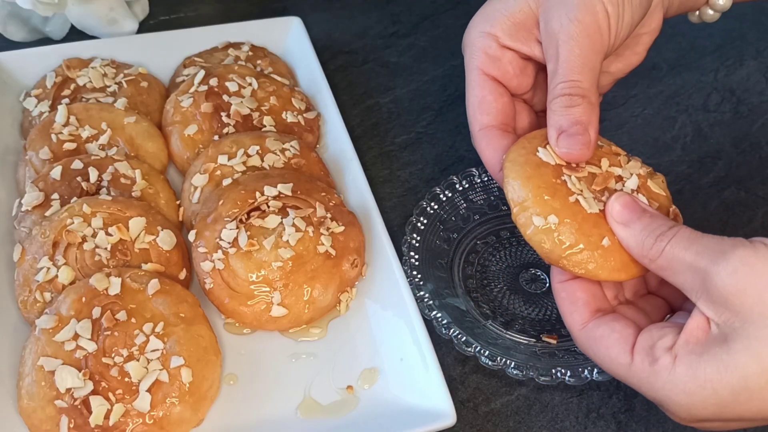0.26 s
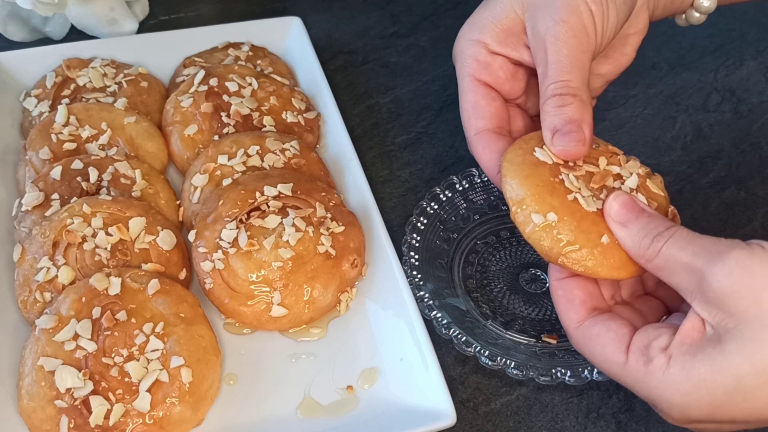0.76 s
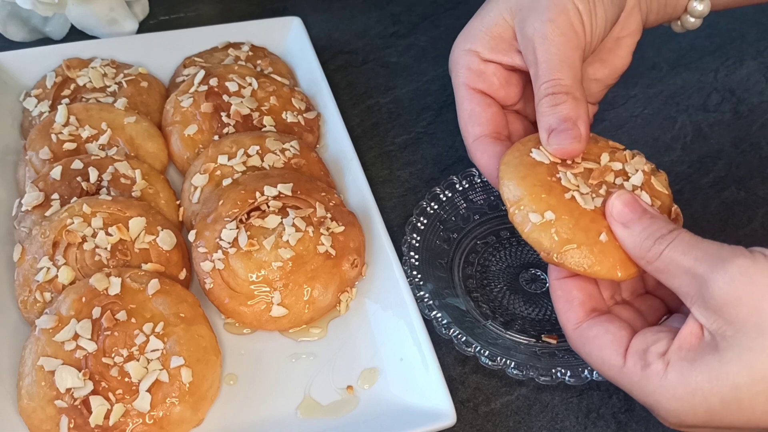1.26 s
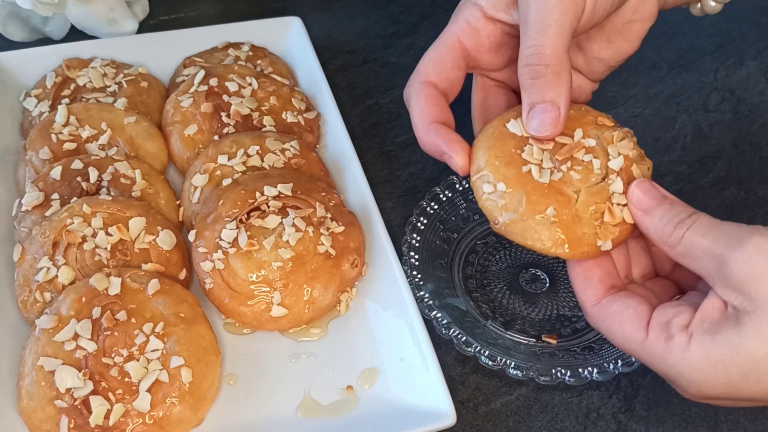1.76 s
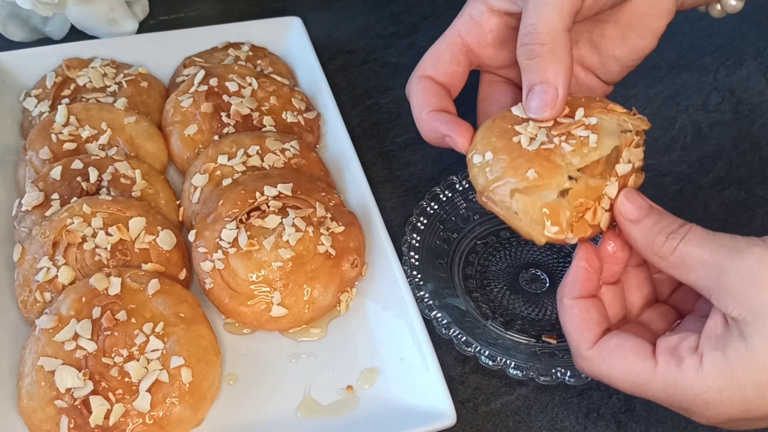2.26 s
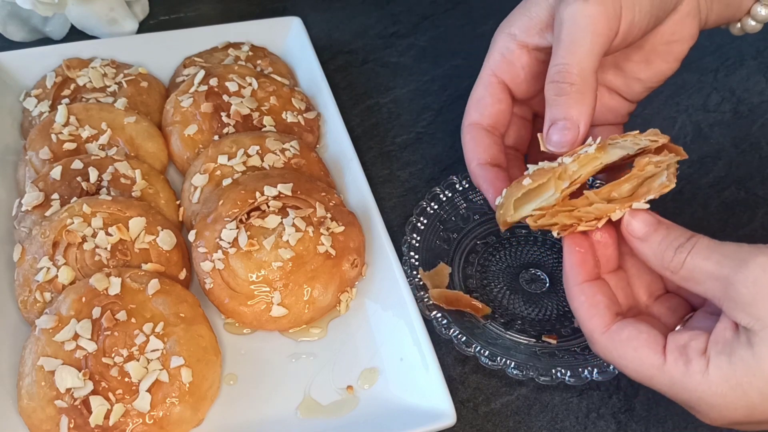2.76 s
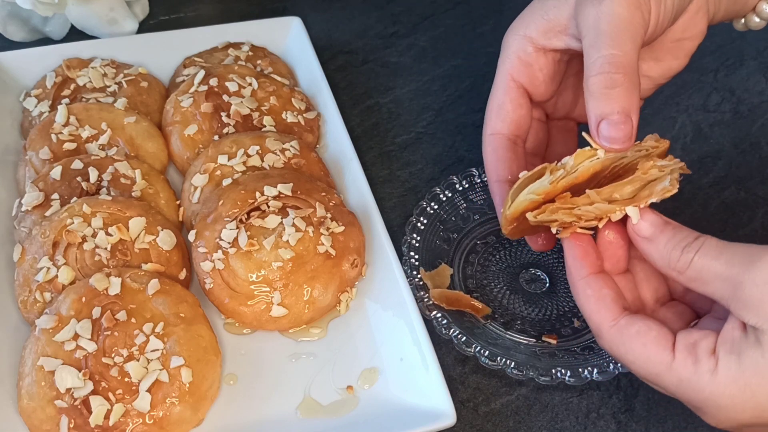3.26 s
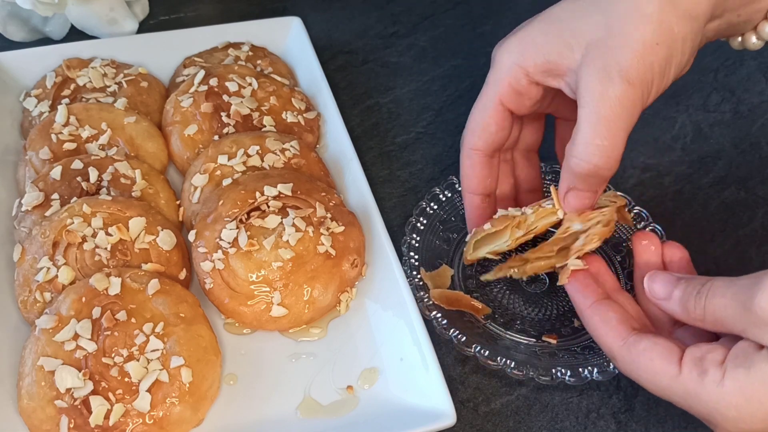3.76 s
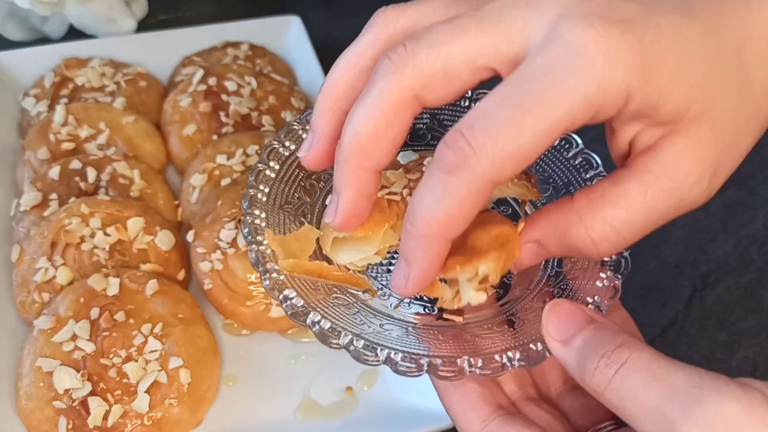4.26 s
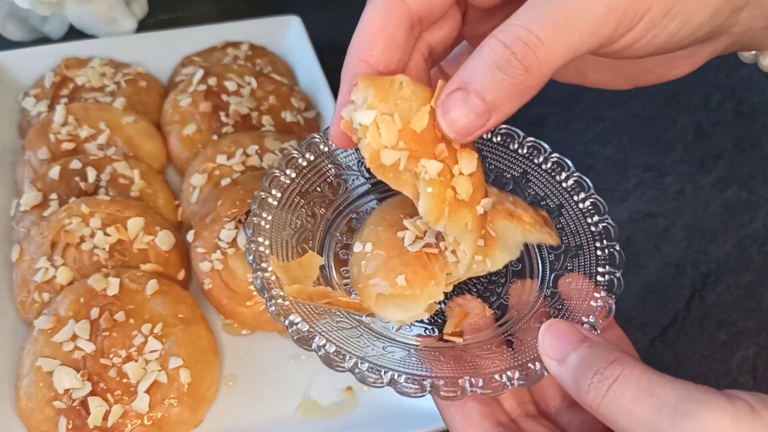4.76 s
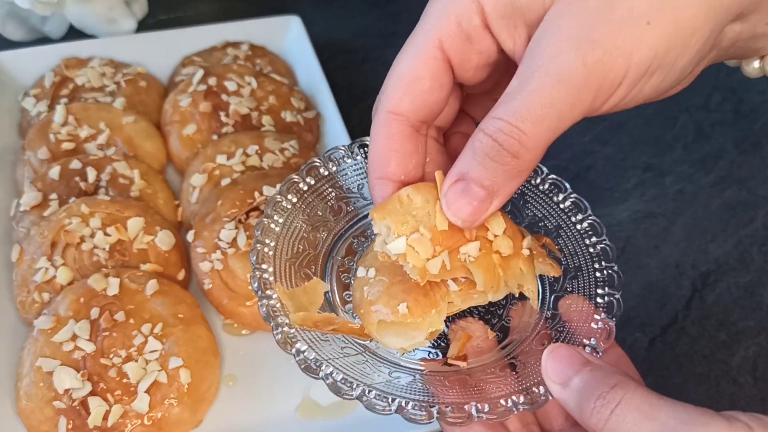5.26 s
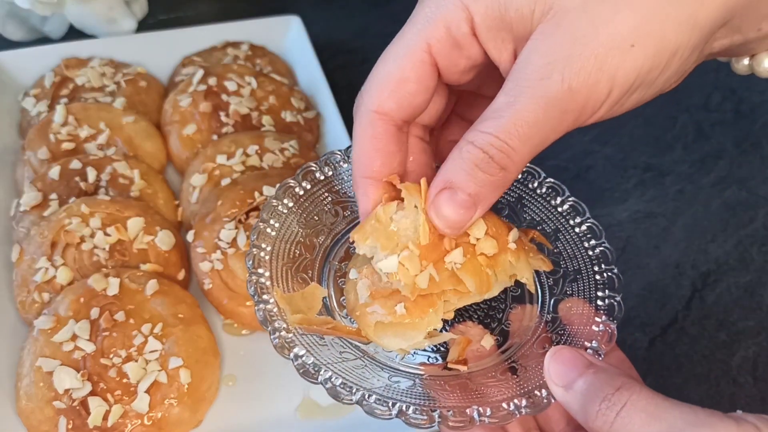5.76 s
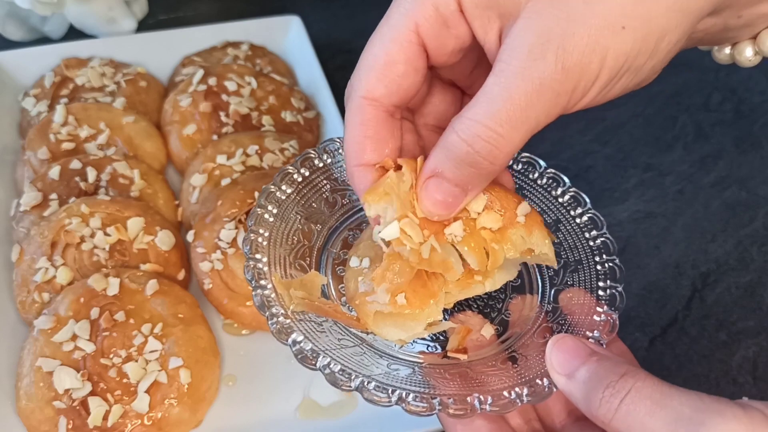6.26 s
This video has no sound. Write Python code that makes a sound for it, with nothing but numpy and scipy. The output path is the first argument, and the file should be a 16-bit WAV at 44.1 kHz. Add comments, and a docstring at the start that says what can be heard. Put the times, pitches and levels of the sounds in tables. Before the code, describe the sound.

Close, dry crust snaps and brittle crackles come in uneven bursts, then soft thuds on a glass plate and a sharp final crunch.

```python
"""In a quiet room, two hands break a crisp, flaky pastry over a small glass plate, close to a phone.
The crust snaps flake by flake (sharp pulses with splinters) and tears in short runs of tiny fractures.
Crumbs crackle under the fingers, bits ring the plate's decaying modes, and the halves are laid down with dull thuds.
Then one half is lifted and squeezed with a loud crunch. A low hum and shaped room noise lie underneath."""
import sys
import numpy as np
from scipy import signal
from scipy.fft import rfft, irfft
from scipy.io import wavfile
from scipy.ndimage import uniform_filter1d, map_coordinates

SR = 44100
rng = np.random.default_rng(int(sys.argv[2]) if len(sys.argv) > 2 else 0)


def put_to_file(sound):
    """Save the sound as 16-bit audio at rate SR, in the file named by the first command-line argument."""
    columns = np.atleast_2d(sound).T  # one column per channel
    safe = np.clip(columns, -1, 1)
    whole_steps = np.round(safe * 32767)
    wavfile.write(sys.argv[1], SR, whole_steps.astype(np.int16))


N = 286650
TIME = np.arange(N) / SR
# ranges of pitch in which thick crumbs and thin splinters ring [Hz]
THICK_HZ, THIN_HZ = (500, 900, 1550, 2600), (4300, 7200, 13000)


def undb(db):
    """Decibels to gain."""
    return 10 ** (np.asarray(db) / 20)


def unit(x):
    """Scale to rms 1."""
    return x / np.sqrt(np.mean(x ** 2) + 1e-18)


def add(out, x, start_s):
    """Mix x into out from start_s."""
    i = max(int(start_s * SR), 0)
    n = min(x.shape[-1], N - i)
    out[..., i:i + n] += x[..., :n]


def colour_db(points, hz):
    """Read (frequency [Hz], level [dB]) points on a log-frequency axis."""
    point_hz, db = np.transpose(points)
    return np.interp(np.log(hz + 1), np.log(point_hz), db)


def background(air_db=-57.5, side_db=-3, hum_hz=100.5, hum_db=-62, wander_rad=.35):
    """Steady shaped room noise, part of it opposite in the two sides, and an appliance hum wandering in pitch."""
    # colour of the room noise: (frequency [Hz], level [dB])
    air_colour = [(25, -16), (55, -14), (90, 4.5), (140, 0.5), (300, -1), (600, -8.5), (1500, -16.5),
                  (4500, -21.5), (5300, -25), (6700, -26), (7600, -28), (8800, -37), (11200, -34),
                  (13500, -20)]
    gain = undb(colour_db(air_colour, np.arange(N // 2 + 1) * SR / N))
    mid, side = (unit(irfft(rfft(rng.standard_normal(N)) * gain, N)) for _ in range(2))
    air = unit(mid + undb(side_db) * side * np.array([[1], [-1]]))
    # noise smoothed twice gives a slow phase drift
    drift = uniform_filter1d(rng.standard_normal(N), SR // 12)
    drift = unit(uniform_filter1d(drift, SR // 12))
    hum = unit(np.sin(2 * np.pi * hum_hz * TIME + wander_rad * drift))
    return undb(air_db) * air + undb(hum_db) * hum


def room(x, near_db=-9, near_s=0.0086, tail_db=-10.5, t60_s=0.28, build_s=0.0011):
    """Quick sparse reflections from hands, plate and table, then the short noise-like tail of the room."""
    t, out = TIME[:SR // 2], []
    for channel in x:
        near = fractures(len(t), per_s=6500, spread_db=4.5) * np.exp(-t / near_s)
        near *= t > .0003  # a short gap after the direct sound
        tail = rng.standard_normal(len(t)) * np.exp(-np.log(1000) * t / t60_s)
        tail *= 1 - np.exp(-t / build_s)
        echo = undb(near_db) * near / np.linalg.norm(near) + undb(tail_db) * tail / np.linalg.norm(tail)
        out.append(channel + signal.fftconvolve(channel, echo)[:N])
    return np.array(out)


def ports(x):
    """The two microphone ports hear the pastry a moment apart, depending on where it is held."""
    # where the pastry is held: (time [s], delay of the left port behind the right [samples])
    place = [(0, 2.5), (4.2, 2), (4.6, -2), (6.5, -2.5)]
    lag = np.interp(TIME, *np.transpose(place))
    left = map_coordinates(x[0], [np.arange(N) - lag / 2], order=3)
    right = map_coordinates(x[1], [np.arange(N) + lag / 2], order=3)
    return np.array([left, right])


def bumps(width=1.35, rise_s=0.00012):
    """Soft contacts give short dull thuds: one damped resonance in a rough rattle."""
    # bumps of pastry, fingers and plate: (time [s], level [dB], centre [Hz], decay [s])
    contacts = [(2.458, -49.5, 727, 0.01), (3.636, -56, 608, 0.04), (3.851, -47, 449, 0.014),
                (3.954, -56, 2010, 0.011), (4.057, -45, 380, 0.022), (4.079, -39, 482, 0.018),
                (4.086, -46, 272, 0.048), (4.088, -42, 705, 0.018), (4.081, -46, 114, 0.031),
                (4.331, -57, 86, 0.068), (4.502, -60.5, 83.4, 0.26), (4.781, -47, 636, 0.007),
                (4.82, -44.5, 1490, 0.011), (5.457, -46.5, 287, 0.017), (5.811, -30.5, 1700, 0.0026),
                (5.811, -30.5, 1180, 0.0019), (5.811, -48, 670, 0.0033)]
    out, t = np.zeros(N), TIME[:SR // 2]
    for s, db, hz, decay_s in contacts:
        band = signal.butter(2, [hz / width, hz * width], "band", fs=SR, output="sos")
        rattle = unit(signal.sosfilt(band, rng.standard_normal(len(t))))
        thud = unit(rattle + np.sin(2 * np.pi * hz * t))
        envelope = np.exp(-t / decay_s) * (1 - np.exp(-t / rise_s))
        add(out, thud * envelope * undb(db), s)
    return out


def plate(favour_db=24):
    """Glass modes ring as decaying sines; each contact favours some of them, and the hand damps the ring."""
    # light hits: (time [s], level [dB], favoured pitch [Hz], contact time [ms], share of the full ring time)
    clinks = [(1.4542, -39.5, 3620, 2, 0.72), (2.4572, -35.5, 3380, 0.66, 0.42),
              (2.393, -54.5, 6900, 2.2, 0.64), (3.851, -40.5, 6950, 1.2, 0.092),
              (3.9377, -32.5, 6900, 6.1, 0.22), (3.977, -41.5, 6900, 3.6, 0.15),
              (4.014, -35, 7000, 4, 0.24)]
    # modes of the plate: (pitch [Hz], relative level [dB], full t60 [s])
    modes = [(1895, 6, 0.26), (3970, 0, 0.13), (6370, -4, 0.25), (6803, 21, 0.12)]
    out, t = np.zeros(N), TIME[:SR // 2]
    for s, db, contact_hz, contact_ms, share in clinks:
        ring = 0
        for hz, mode_db, t60 in modes:
            # modes lose favour_db at one octave from the favoured pitch
            gain = undb(mode_db - favour_db * np.log2(hz / contact_hz) ** 2)
            decay = np.exp(-np.log(1000) * t / (t60 * share))
            ring = ring + gain * np.sin(2 * np.pi * (hz * t + rng.random())) * decay
        rise = 1 - np.exp(-t * 10 ** 3 / contact_ms)
        add(out, ring * rise * undb(db), s)
    return out


def thickness(s):
    """Body and edge [dB] of the flakes at time s: thick outer crust first, thin inner leaves in the lifted half."""
    # thickness of the crust: (time [s], body below 3 kHz [dB], edge above 6 kHz [dB])
    layers = [(0, 0.5, 1), (.55, 3.5, -1), (1.8, 4, -4), (2.25, -2, -10), (4.1, 4, -3.5), (4.8, 4.5, -4.5),
              (5.45, -8.5, -5), (5.8, -30, -7.5), (6.2, -20.5, -3), (6.5, -27, 14)]
    times, body_db, edge_db = np.transpose(layers)
    return np.interp(s, times, body_db), np.interp(s, times, edge_db)


def flake(body_db, edge_db, size=512):
    """Causal response of one breaking flake: big ones have body, thin ones edge."""
    # colour of breaking crust at the phone: (frequency [Hz], level [dB])
    crust = [(150, -27.5), (780, -14), (1200, -14), (2250, -3.5), (3200, -7), (4500, 1.5), (5300, -10.5),
             (6550, 9.5), (7500, 6.5), (8400, -2), (9300, -17.5), (11200, -32.5), (11900, -5),
             (15500, -6.5)]
    hz = np.arange(size // 2 + 1) * SR / size
    tilt = [(2400, body_db), (4000, 0), (5000, 0.0042), (6500, edge_db)]
    db = colour_db(crust, hz) + colour_db(tilt, hz)
    # fold the cepstrum for minimum phase, so the energy comes first
    cepstrum = irfft(np.log(undb(db)))
    cepstrum[1:size // 2] *= 2
    cepstrum[size // 2 + 1:] = 0
    response = irfft(np.exp(rfft(cepstrum)))
    return response / np.linalg.norm(response)


def fractures(n, per_s, spread_db):
    """Random tiny impulses of either sign, mostly weak and a few strong."""
    chance = rng.random((3, n))
    size_db = spread_db * np.minimum(-np.log(1 - chance[1]), 4)
    return (chance[0] < per_s / SR) * undb(size_db) * np.sign(chance[2] - .5)


def crumbs(n, pitches, per_s, spread_db, own_db, width=1.356):
    """Stereo fractures, each crumb size ringing in its pitch range: shared ones plus its own, partly one-sided."""
    shared, out = unit(fractures(n, per_s, spread_db)), 0
    for hz in pitches:
        own, left, right = (unit(fractures(n, per_s, spread_db)) for _ in range(3))
        band = signal.butter(2, [hz / width, hz * width], "band", fs=SR, output="sos")
        hits = shared + undb(own_db) * (own + np.array([left, right]) / 2)
        out = out + signal.sosfilt(band, hits)
    return unit(out)


def pressure(holding_db=-70.5, holding_dull_db=-9, attack_s=0.049, release_db_per_s=230):
    """Gains of dull crumbs and splinters: each grip builds up quickly, holds and dies away to faint holding."""
    # fingers press or shift their grip: (time [s], length [s], level [dB], extra dull crumbs [dB])
    grips = [(0.03, 0.51, -59.5, 0.5), (0.588, 0.072, -47.5, 3.5), (0.806, 0.19, -48.5, 1),
             (1.03, 0.051, -44, 0), (1.129, 0.051, -43.5, -0.5), (1.306, 0.082, -52, 1.5),
             (1.54, .12, -59.5, -2), (1.75, 0.044, -39, 6.5), (2.204, 0.12, -49, 4.5),
             (2.389, 0.059, -51.5, 7.5), (2.487, 0.28, -62.5, -0.5), (3.52, 0.35, -62.5, -4),
             (4.25, 0.094, -61.5, 3.5), (4.424, 0.41, -54.5, 2), (4.882, 0.041, -56, -3),
             (5.194, 0.18, -59, -22), (5.337, 0.22, -43, -0.5), (5.68, 0.55, -54, 3.5),
             (6.243, 0.22, -47, 3)]
    dull, bright = undb(holding_db + holding_dull_db), undb(holding_db)
    for s, length, db, dull_db in grips:
        attack = np.clip((TIME - s) / attack_s + .5, 0, 1)
        release_db = release_db_per_s * np.maximum(TIME - s - length, 0)
        grip = attack * undb(db - release_db)
        dull = np.maximum(dull, grip * undb(dull_db))
        bright = np.maximum(bright, grip)
    return dull, bright


def crackle(dull_db=-6, bright_db=1.5, dull_per_body=.5, uneven_db=2, slip_s=.025):
    """Crumbs and splinters tick in clumps as the fingers press and slip; thick crust sheds more dull crumbs."""
    out = 0
    body_db, _ = thickness(TIME)
    slips_db = uneven_db * np.interp(TIME / slip_s, np.arange(N), rng.standard_normal(N))
    dull_grip, bright_grip = pressure()
    layers = [(THICK_HZ, dull_grip, dull_db + dull_per_body * body_db), (THIN_HZ, bright_grip, bright_db)]
    for pitches, grip, db in layers:
        ticks = crumbs(N, pitches, per_s=130, spread_db=3, own_db=5.5) * undb(slips_db)
        ticks = signal.fftconvolve(ticks, flake(0, 0)[None])[:, :N]
        out = out + unit(ticks) * grip * undb(db)
    return out


def tears():
    """A crack running through many layers: dense small fractures, spread across the width of the pastry."""
    # tearing runs: (time [s], length [s], level [dB])
    runs = [(0.494, .055, -31.5), (0.886, 0.07, -46.5), (1.169, 0.035, -39), (1.702, 0.016, -43),
            (1.785, .065, -35.5), (2.24, 0.045, -41.5), (4.055, 0.046, -45), (4.54, 0.047, -43.5),
            (4.692, 0.02, -42), (4.745, 0.039, -47.5), (5.406, 0.035, -37), (5.448, 0.021, -18),
            (5.762, .024, -46), (5.861, 0.014, -44), (6.359, 0.061, -43.5)]
    out = np.zeros((2, N))
    for s, length, db in runs:
        n = int(length * SR)
        run = crumbs(n, THICK_HZ + THIN_HZ, per_s=600, spread_db=2, own_db=12)
        run = unit(run * signal.windows.tukey(n, .5))
        add(out, signal.fftconvolve(run, flake(*thickness(s))[None]) * undb(db), s)
    return out


def snaps(decay_s=0.0019, lead_db=-14, creak_s=0.0019, body_per_db=0.05, full_db=-29, scatter_db=-1, size=1024):
    """Each flake creaks briefly, gives way with one sharp pulse and splinters; louder flakes are thicker."""
    # loudest single flakes: (time [s], level [dB], left minus right [dB])
    flakes = [(0.1421, -35, 0), (0.166, -33, -5), (0.2041, -24, 0.5), (0.3223, -39.5, -3),
              (0.4107, -33, 1.5), (0.4759, -26.5, 12.5), (0.482, -29, -9), (0.487, -31, -14),
              (0.4967, -26, 0), (0.507, -21, -2), (0.5141, -24.5, 7), (0.5332, -33.5, -7), (0.5469, -27, 1),
              (0.6468, -30.5, -7), (0.6534, -24.5, 2.5), (0.6965, -41, -7), (0.7152, -32.5, 1),
              (0.7859, -24.5, 6), (0.8023, -32, -11), (0.8085, -30.5, 7), (0.835, -35, 0), (0.8536, -33, 4),
              (0.8774, -18.5, -1.5), (0.9, -28.5, -2), (0.9133, -21, 3), (1.008, -38.5, 0),
              (1.0375, -27.5, -0.5), (1.062, -29.5, -1), (1.0847, -26.5, 2.5), (1.1778, -28, -8),
              (1.1856, -30, 7), (1.1942, -36, 0), (1.2202, -35.5, 0), (1.285, -41.5, -6), (1.303, -44, 10),
              (1.7059, -27.5, -3), (1.7576, -27.5, -1), (1.771, -26, -2), (1.7786, -27.5, 4),
              (1.7935, -27.5, -16), (1.808, -22, 6), (1.9545, -44.5, 3), (2.245, -18.5, -0.5),
              (2.376, -45, 0), (2.5188, -43.5, -1), (3.685, -47, 0), (3.8506, -36, 1.5), (4.0526, -25, -1),
              (4.5749, -38, 10), (4.6312, -36.5, 4), (4.753, -32, 2), (4.771, -33, 0), (4.782, -37, 3),
              (5.265, -47, 5), (5.3255, -38, 3), (5.3736, -24.5, 3), (5.441, -22, 0), (5.455, -26, 14),
              (5.4599, -12.5, 1), (5.4627, -15, 4), (5.7778, -31.5, 1.5), (5.929, -41, 8.5),
              (5.982, -43.5, 15), (6.116, -25, 0), (6.1817, -28.5, -2), (6.2352, -36.5, -2),
              (6.264, -33, -4), (6.288, -28.5, -2), (6.2947, -26, 0), (6.386, -32.5, 3),
              (6.4136, -33.5, 7.5)]
    out, onset = np.zeros((2, N)), size // 3
    t = (np.arange(size) - onset) / SR
    span = .0032 * SR  # stretch over which the level is reckoned [samples]
    creak = undb(lead_db) * np.exp(-abs(t) / creak_s)
    envelope = np.where(t < 0, creak, np.exp(-abs(t) / decay_s))
    for s, db, pan_db in flakes:
        crack, left, right = (unit(fractures(size, per_s=9000, spread_db=6.5) * envelope) / np.sqrt(size)
                              for _ in range(3))
        crack[onset] += 1  # the main pulse
        body_db, edge_db = thickness(s)
        response = flake(body_db + body_per_db * min(db - full_db, 0), edge_db)
        # a flake radiates unevenly, so each side gets some splinters of its own
        sides = crack + undb(scatter_db) * np.array([left, right])
        snap = signal.fftconvolve(sides, response[None])
        snap *= np.sqrt(span) / np.linalg.norm(snap, axis=1, keepdims=True)
        side_db = db + np.array([[pan_db], [-pan_db]]) / 2
        add(out, snap * undb(side_db), s - onset / SR)
    return out


def scene():
    """Pastry and plate, heard at two ports in the room, over the background."""
    close = snaps() + tears() + crackle() + plate() + bumps()
    return room(ports(close)) + background()


def record(dry, top_hz=15800):
    """The phone clips at full scale and cuts the top with a steep low-pass."""
    low_pass = signal.ellip(12, .2, 90, top_hz, fs=SR, output="sos")
    return signal.sosfilt(low_pass, np.clip(dry, -1, 1))


dry = scene()
out = record(dry)
put_to_file(out)
```